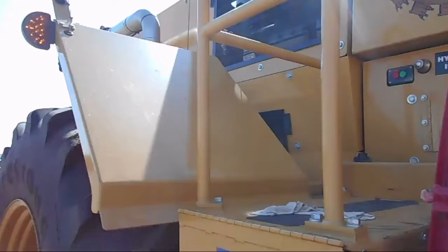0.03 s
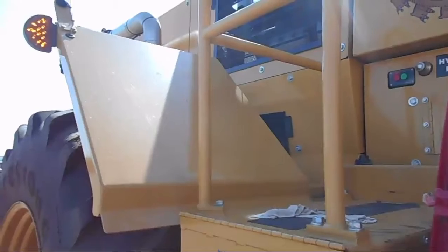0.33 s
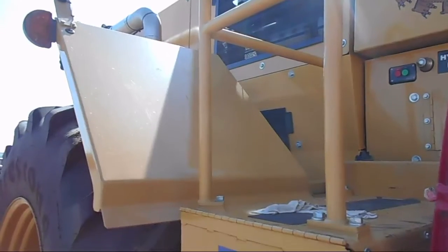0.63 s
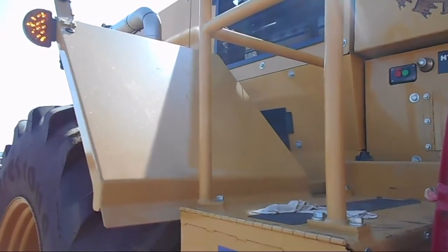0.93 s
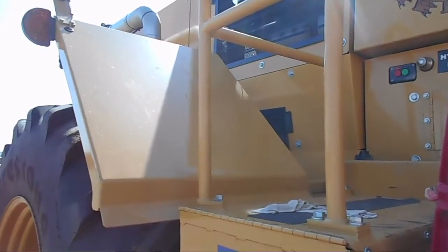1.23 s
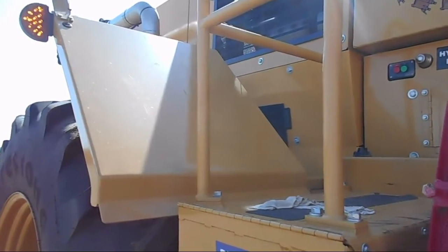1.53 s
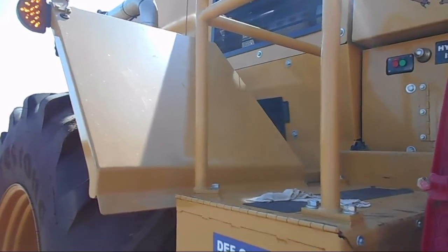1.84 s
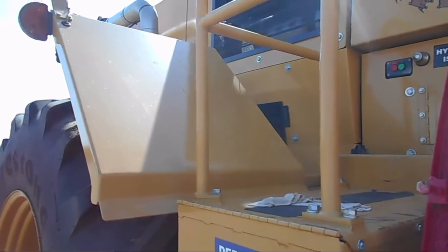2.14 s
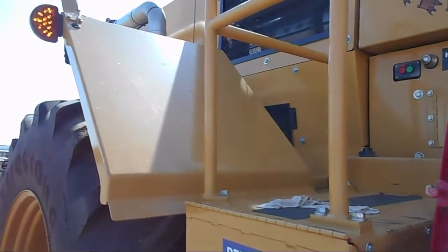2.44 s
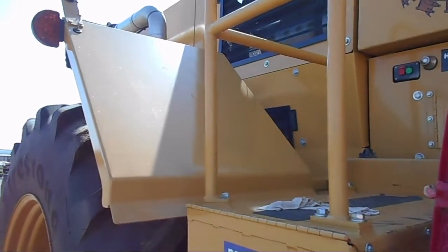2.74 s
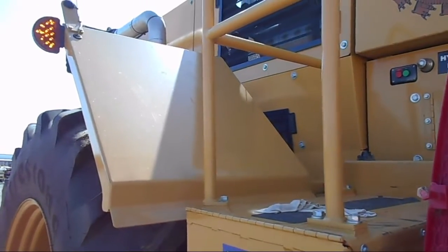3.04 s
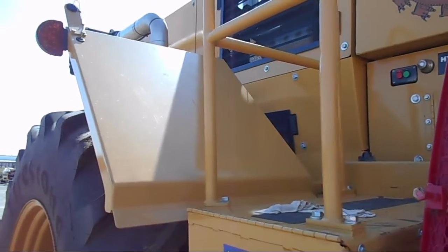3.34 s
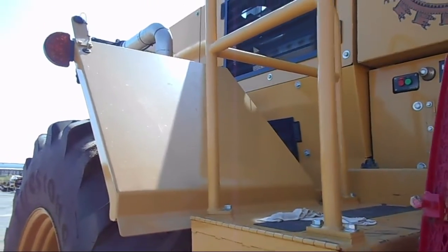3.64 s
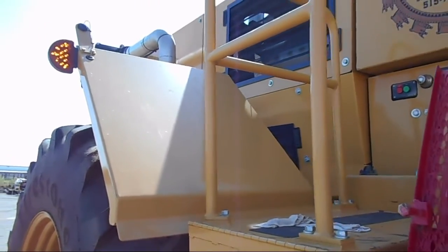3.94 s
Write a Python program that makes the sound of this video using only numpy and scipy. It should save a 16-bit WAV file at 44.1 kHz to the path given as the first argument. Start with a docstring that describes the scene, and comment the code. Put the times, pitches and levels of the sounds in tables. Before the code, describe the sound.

A diesel engine idles close by outdoors, with a rising fan hum and faint ticks.

```python
"""A six-cylinder diesel idles close by on a parked wheel loader, outdoors. The sound cuts in, dips at
once and swells back: each firing shakes the block, valves and injectors clatter, the exhaust throbs
and gears whine. From 0.6 s a flasher relay ticks once a second. Halfway through, the cooling fan
speeds up; its hum rises over the rush of air, its load pulls the idle down a little, and the knock
grows softer."""
import sys
import numpy as np
from scipy import signal
from scipy.fft import rfft, irfft
from scipy.io import wavfile

SR = 44100
rng = np.random.default_rng(int(sys.argv[2]) if len(sys.argv) > 2 else 0)


def transcribe(signal):
    """Save signal, clipped to [-1, 1], as a 16-bit WAV file at the path in sys.argv[1]."""
    frames = np.atleast_2d(signal).T
    limited = np.clip(frames, -1, 1)
    pcm = np.round(limited * 32767).astype(np.int16)
    wavfile.write(sys.argv[1], SR, pcm)


N = 176400
T = np.arange(N) / SR
HZ = np.fft.rfftfreq(N, 1 / SR)

# Crankshaft speed: time_s, turns_per_s
CRANK_SPEED = [(0, 13.35), (.6, 13.325), (1.73, 13.338), (2.0, 13.087), (2.45, 12.97), (2.8, 13.033),
               (3.4, 13.1), (4.0, 13.18)]
# Knock of each cylinder, in firing order: gain_db
CYLINDER_DB = [0.29, 1, 0.7, 0.76, -0.71, 0.83]
# Broad resonance of the block: frequency_hz, relative_db
BLOCK_SPECTRUM = [(60, -13), (160, -7), (420, 0.5), (950, 0), (1300, -8.5), (1650, -8), (1900, -26.5),
                  (2400, -14), (2650, -12), (3850, -13), (4190, -16.5), (4270, -21.5), (6200, -20.5),
                  (7200, -34.5), (10000, -33.5), (15000, -37.5)]
# Injector and valve clicks around one engine cycle: gain_db
VALVE_DB = [3, -1, -1, -16, 3, -2, -2, 0, 2, -5, 1, -3]
# Metallic ring of those clicks: frequency_hz, relative_db
CLATTER_SPECTRUM = [(500, -32), (1500, -7), (2800, 6.5), (3900, 4), (4400, -8), (6200, -4.5), (8000, -10),
                    (15000, -24)]
# Envelope of knock and clatter together: time_s, gain_db
RATTLE_ENVELOPE = [(0, -1), (1.3, 0), (1.9, 0.5), (2.4, -1.5), (2.7, -3.5), (4, -4)]
# Exhaust harmonics: multiple_of_firing_rate, level_db
EXHAUST_HARMONICS = [(1, -31), (2, -35.5), (3, -32.5)]
# Exhaust envelope: time_s, gain_db
EXHAUST_ENVELOPE = [(.15, 5.5), (.4, 4), (.8, 3.5), (1.7, -3), (2.3, -4), (4, -1)]
# Pump and gear tones: multiple_of_crank_speed, level_db, change_under_load_db
GEAR_ORDERS = [(21, -29.5, 2.5), (27, -43.5, 8), (31.36, -33.5, -4.5), (42.4, -35, -0.5), (62.4, -39, -1.5),
               (65.5, -38.5, 0), (67.2, -39, 0), (78.2, -32.5, 1.5), (86.75, -44.5, 8), (93, -57, 7),
               (99.5, -49, 8), (117.2, -46.5, 2), (152.4, -46, -15), (196.1, -41.5, -1)]
# Course of the fan hum: time_s, blade_pass_hz, level_db
FAN_COURSE = [(0, 131, -19), (1.9, 131.2, -20), (2.07, 132.6, -20), (2.4, 141.9, -20), (2.6, 147.1, -20),
              (3.0, 153.6, -20), (3.45, 158, -19), (3.8, 160.1, -18.5), (4, 161, -17.5)]
# Fan harmonics: multiple_of_blade_pass, low_speed_db, middle_speed_db, high_speed_db, waver_db
BLADE_HARMONICS = [(1, -2, 1, 1, 0.6), (2, -11, -7, -6.5, 1.4), (3, -15.5, -6.5, -11, 2.5),
                   (4, -9.5, -6.5, -13, 3), (5, -18.5, -7.5, -21, 2), (6, -12.5, -13, -26, 3)]
# Rush of cooling air: frequency_hz, relative_db
AIR_SPECTRUM = [(20, -10), (55, -11), (100, -2.5), (170, 5.5), (220, 0), (350, 0.5), (700, -1), (1100, -5),
                (1900, -16.5), (3200, -13), (4100, -15.5), (4350, -24), (6000, -22.5), (9000, -34.5),
                (15000, -48.5)]
# Relay click pairs: start_s, tick_db, tock_db
RELAY_CLICKS = [(0.611, -28, -23.5), (1.6103, -26.5, -24), (2.6095, -29, -25.5), (3.6084, -29, -28)]
# Bright first click: frequency_hz, relative_db
TICK_SPECTRUM = [(2000, -30), (5000, -4), (7000, 6), (9500, -2), (14000, -6)]
# Duller second click: frequency_hz, relative_db
TOCK_SPECTRUM = [(1500, -18), (4000, 7), (6500, 1.5), (9000, -11), (14000, -25)]
# Narrow resonances of covers and panels: pitch_hz, width_hz, lift_db
PANEL_MODES = [(413, 15, 2), (882, 25, 2), (1287, 11, 3), (1410, 20, 1), (1730, 27, 4.5), (2064, 28, 3),
               (2970, 25, 2), (3112, 13, 3), (3835, 57, 3), (4700, 32, 4), (4970, 25, 1), (6080, 170, 1.5),
               (7850, 100, 4.5), (14200, 150, 3)]
# Envelope of the whole sound: time_s, gain_db
OVERALL_ENVELOPE = [(.117, -4.5), (.162, -4.5), (.169, -14.5), (.3, -8.5), (.48, -5), (.66, -2.5),
                    (.71, -3.5), (.745, -2), (1.1, -1), (1.6, 0.5), (2.3, 1), (2.8, 0.5), (3.5, 0.5),
                    (3.7, -0.5), (4, 0)]

CYLINDERS = 6


def knocks(turns):
    """Forced vibration: each firing shakes the block, partly alike in every two-turn cycle."""
    lag, rise, decay = 0.8, 0.075, 0.62  # shares of one firing interval
    scatter_db, repeating_share = 1.35, 0.49
    firings = turns * CYLINDERS / 2 + 1 - lag
    index, age = firings.astype(int), firings % 1
    strength = amp(np.take(CYLINDER_DB, index % CYLINDERS) + scatter_db * noise()[index])
    blow = (1 - np.exp(-age / rise)) * np.exp(-age / decay) + 0.7  # the block never comes to rest
    cycle_samples = int(2 * N / turns[-1])
    pattern = np.interp(turns / 2 % 1 * cycle_samples, np.arange(cycle_samples), noise()[:cycle_samples])
    shake = np.sqrt(repeating_share) * unit(pattern) + np.sqrt(1 - repeating_share) * noise()
    return amp(-21) * colour(shake * blow * strength, BLOCK_SPECTRUM)


def clatter(turns):
    """Impact excitation: injectors and valves strike twice a firing, unevenly, and ring briefly."""
    scatter_db, clump_db = 5, 1.3
    index = (turns * CYLINDERS).astype(int)
    strength_db = np.take(VALVE_DB, index % len(VALVE_DB)) + scatter_db * rng.uniform(-1.1, 1, N)
    impacts = np.diff(index, prepend=0) * amp(strength_db + clump_db * drift(12))
    envelope = signal.fftconvolve(impacts, damping(T, t60_s=0.04))[:N]
    return amp(-36.5) * colour(envelope * noise(), CLATTER_SPECTRUM)


def exhaust(turns):
    """Periodic gas pulses make a deep throb at harmonics of the firing rate."""
    firings = turns * CYLINDERS / 2
    throb = sum(amp(db) * sine(k * firings) for k, db in EXHAUST_HARMONICS)
    return amp(curve(EXHAUST_ENVELOPE)) * throb


def pump_and_gears(turns):
    """Rotational orders: hum and whine lock to the crank; their balance shifts as load slows it."""
    speed = curve(CRANK_SPEED)
    load = np.clip(2 * (speed.max() - speed) / np.ptp(speed), 0, 1)
    whine, waver_db = 0, 0.5
    for order, db, load_db in GEAR_ORDERS:
        locked_order = round(2 * order) / 2  # whole periods in each two-turn cycle
        whine += amp(db + load_db * load + waver_db * drift(1.9)) * sine(locked_order * turns)
    return whine


def fan():
    """Blade-pass harmonics shift with speed; turbulence modulates their amplitude and phase."""
    low_hz, middle_hz, high_hz = 131.3, 143, 150.5
    jitter_rad_per_db, fade_start_s, fade_db_per_s = 0.21, 3.43, 16
    pass_hz = curve(FAN_COURSE)
    passes, hum = np.cumsum(pass_hz) / SR, 0
    for k, *speed_db, waver_db in BLADE_HARMONICS:
        db = np.interp(pass_hz, [low_hz, middle_hz, high_hz], speed_db) + waver_db * drift(7)
        if k == 1:  # the fundamental thins out at the end
            db -= fade_db_per_s * np.maximum(T - fade_start_s, 0)
        phase = 2 * np.pi * (k * passes + rng.random())
        hum += amp(db) * np.sin(phase + jitter_rad_per_db * waver_db * drift(11.5))
    return np.sqrt(2) * amp(curve(FAN_COURSE, column=2)) * hum


def cooling_air():
    """Turbulent flow from the fan radiates broadband noise that flutters a little."""
    level_db = -20.5 + 0.5 * drift(22)
    return amp(level_db) * colour(noise(), AIR_SPECTRUM)


def relay():
    """Damped impacts: a bright tick, then a duller tock just after it."""
    def click(start_s, spectrum, t60_s):
        return colour(noise(), spectrum) * (T >= start_s) * damping(abs(T - start_s), t60_s)
    clicks, tock_delay_s = 0, 0.042
    for start_s, tick_db, tock_db in RELAY_CLICKS:
        clicks += amp(tick_db) * click(start_s, TICK_SPECTRUM, t60_s=0.091)
        clicks += amp(tock_db) * click(start_s + tock_delay_s, TOCK_SPECTRUM, t60_s=0.063)
    return clicks


def bodywork(x):
    """Resonance and reflection: steel panels ring; fender, deck and hood return short echoes."""
    lift_db = sum(db * bell(hz, width_hz) for hz, width_hz, db in PANEL_MODES)
    reflections = noise() * (T > 0.003) * damping(T, t60_s=0.011)
    bass_cut = HZ / (HZ + 600)
    echoes = amp(-10) * rfft(reflections / np.linalg.norm(reflections)) * bass_cut
    return irfft(rfft(x) * amp(lift_db) * (1 + echoes), N)


def amp(db):
    """Decibels to amplitude ratio."""
    return 10 ** (np.asarray(db) / 20)


def unit(x):
    """Normalisation to rms 1."""
    return x / np.sqrt(np.mean(x ** 2) + 1e-20)


def noise():
    """White Gaussian noise."""
    return rng.standard_normal(N)


def sine(cycles):
    """A pure tone of rms 1 with a random starting phase."""
    return np.sqrt(2) * np.sin(2 * np.pi * (cycles + rng.random()))


def damping(age_s, t60_s):
    """Exponential decay, by 60 dB in t60_s."""
    return np.exp(-np.log(1000) * age_s / t60_s)


def bell(centre_hz, width_hz):
    """A Gaussian band of height 1."""
    return np.exp(-((HZ - centre_hz) / width_hz) ** 2)


def curve(table, column=1):
    """Linear interpolation of a time table at every sample."""
    rows = np.array(table)
    return np.interp(T, rows[:, 0], rows[:, column])


def colour(x, spectrum):
    """Spectral shaping of x, at rms 1."""
    hz, db = np.transpose(spectrum)
    gain = amp(np.interp(np.log(HZ + 1), np.log(hz), db))
    return unit(irfft(rfft(x) * gain, N))


def drift(rate_hz):
    """Low-pass noise: slow random motion of rms 1."""
    return unit(irfft(rfft(noise()) * bell(0, rate_hz), N))


def scene():
    """Superposition of engine, fan and relay at one point."""
    hunting = 0.001207 * drift(8.08)  # wander as a share of the speed
    turns = np.cumsum(curve(CRANK_SPEED) * (1 + hunting)) / SR
    rattle = amp(curve(RATTLE_ENVELOPE)) * (knocks(turns) + clatter(turns))
    body = bodywork(rattle + cooling_air())
    return (body + exhaust(turns) + pump_and_gears(turns) + fan() + relay())[None]


def record(dry):
    """Gain and filtering: the level cuts in, dips and recovers; the treble is notched and band-limited."""
    start_s, cutoff_hz = 0.1165, 14900
    notch = amp(-12 * bell(centre_hz=11010, width_hz=730))
    heard = irfft(rfft(dry) * notch, N) * amp(curve(OVERALL_ENVELOPE)) * (T >= start_s)
    low_pass = signal.firwin(511, cutoff_hz, window=("kaiser", 9), fs=SR)
    return signal.oaconvolve(heard, low_pass[None], "same")


dry = scene()
out = record(dry)
transcribe(out)
```